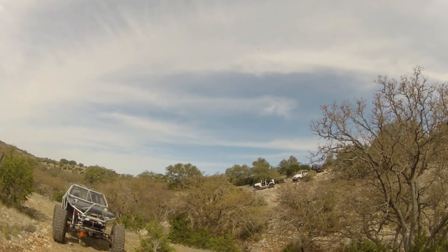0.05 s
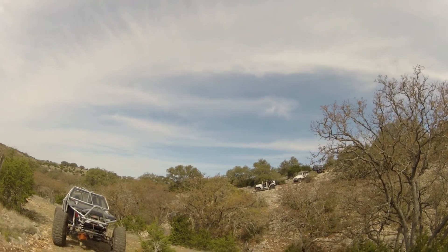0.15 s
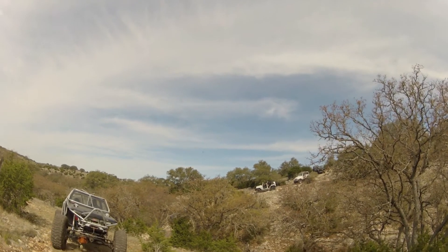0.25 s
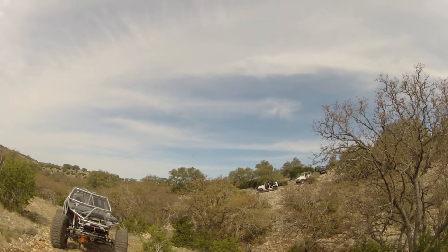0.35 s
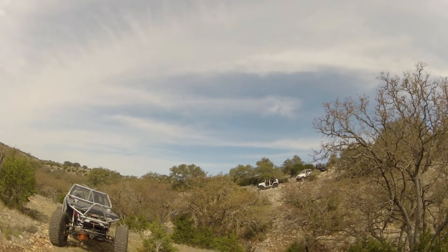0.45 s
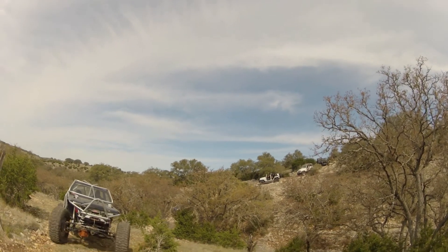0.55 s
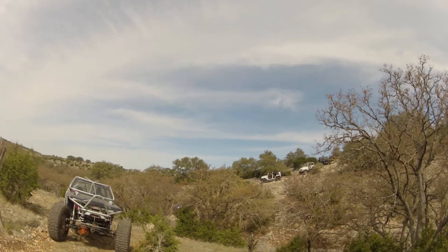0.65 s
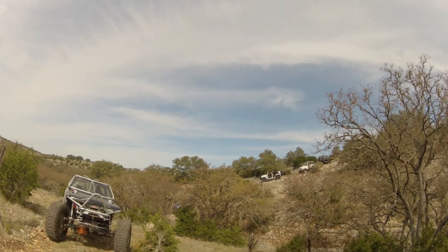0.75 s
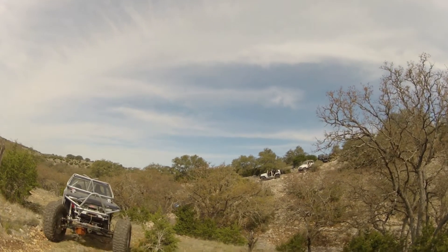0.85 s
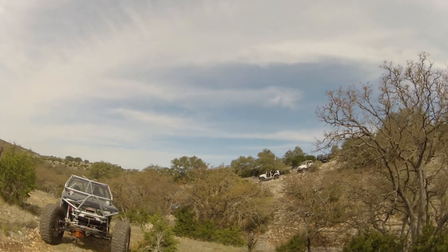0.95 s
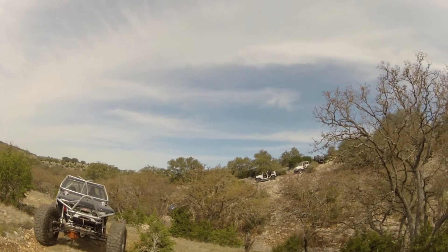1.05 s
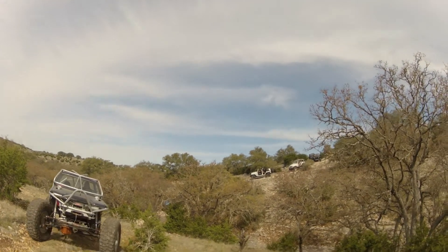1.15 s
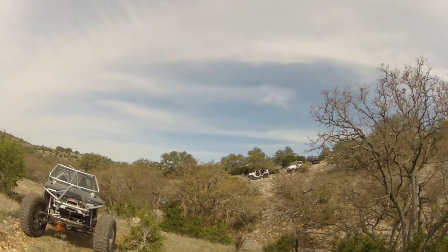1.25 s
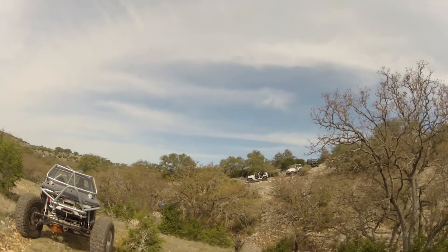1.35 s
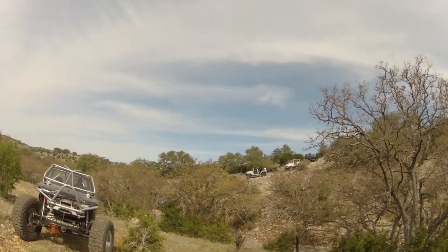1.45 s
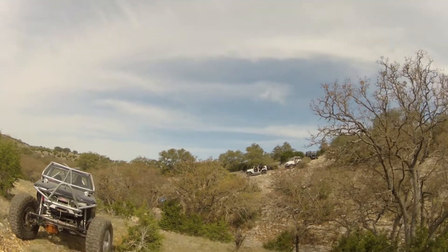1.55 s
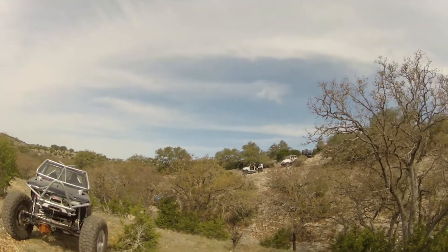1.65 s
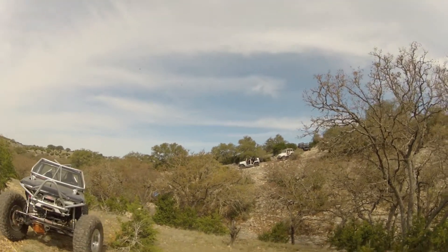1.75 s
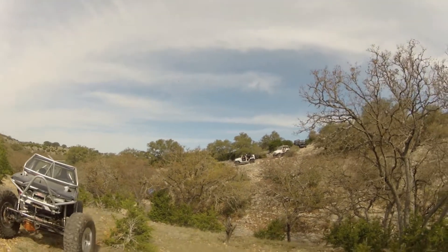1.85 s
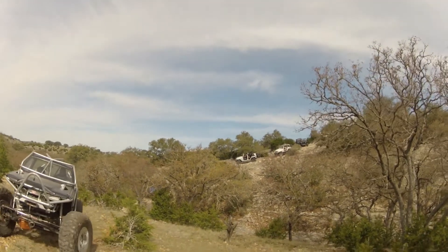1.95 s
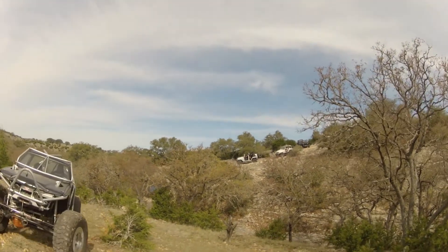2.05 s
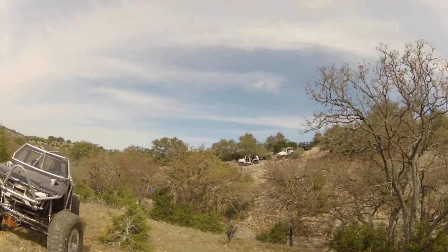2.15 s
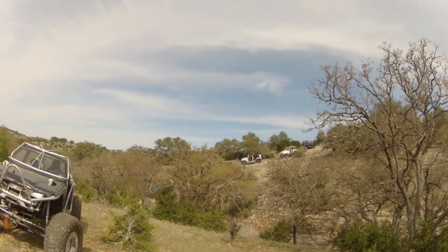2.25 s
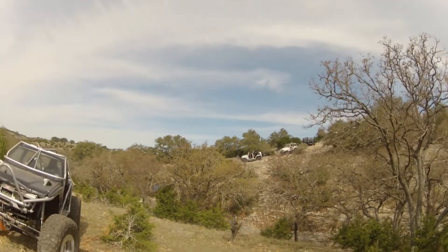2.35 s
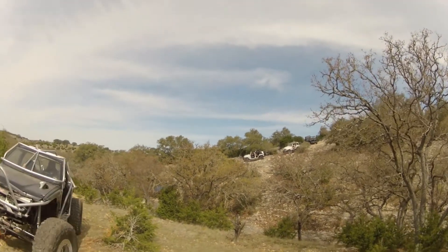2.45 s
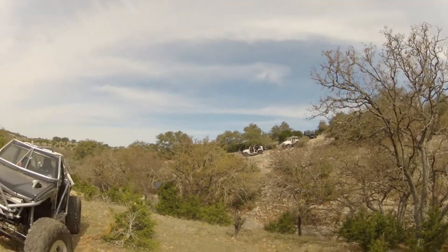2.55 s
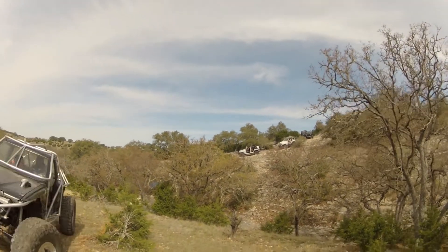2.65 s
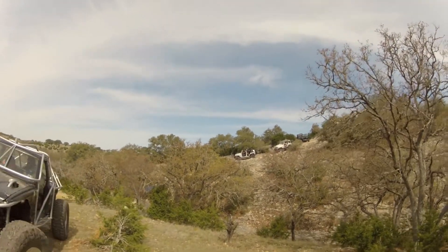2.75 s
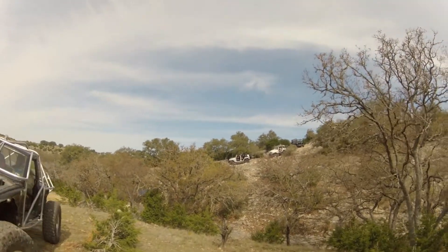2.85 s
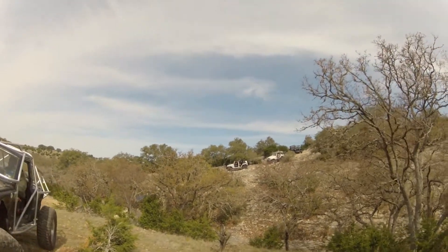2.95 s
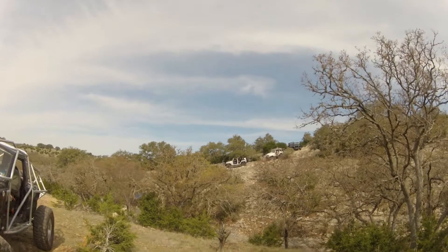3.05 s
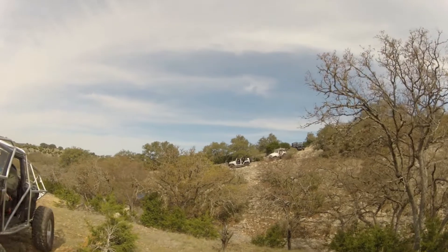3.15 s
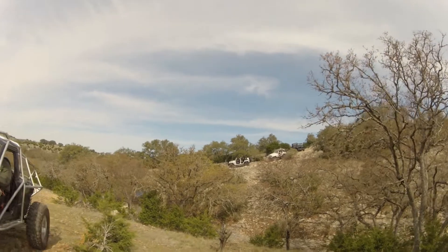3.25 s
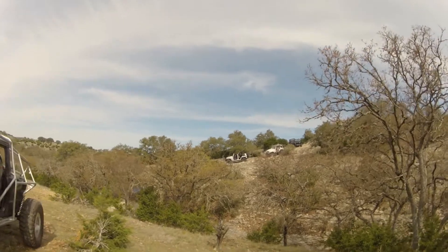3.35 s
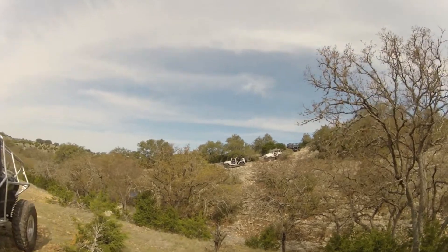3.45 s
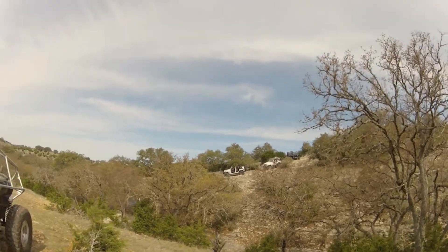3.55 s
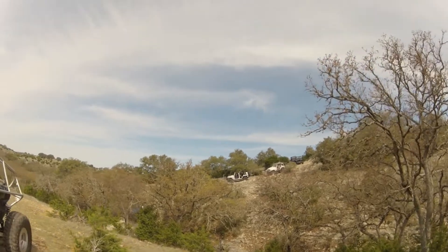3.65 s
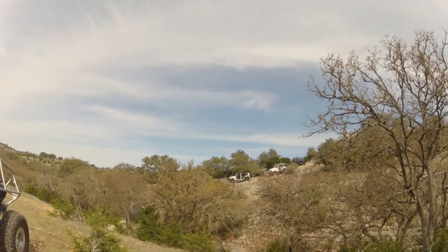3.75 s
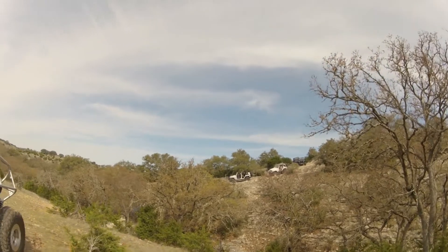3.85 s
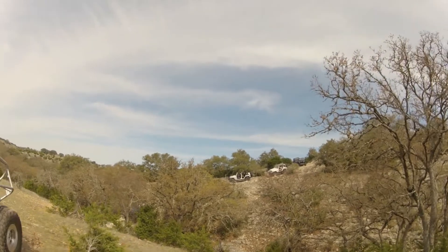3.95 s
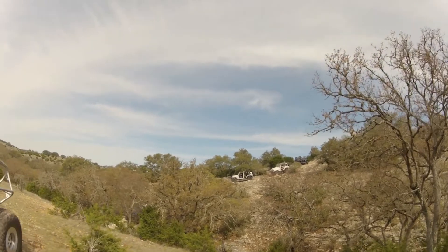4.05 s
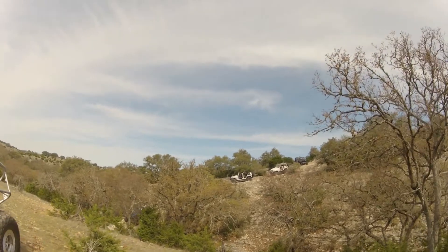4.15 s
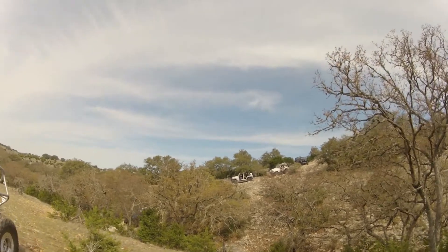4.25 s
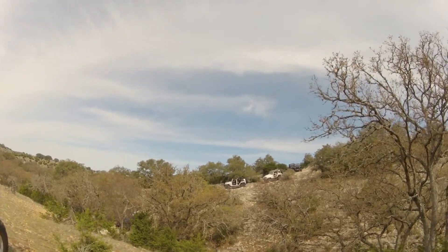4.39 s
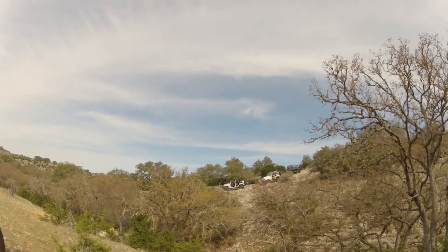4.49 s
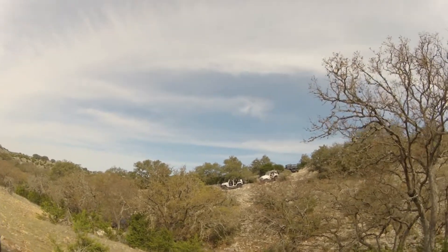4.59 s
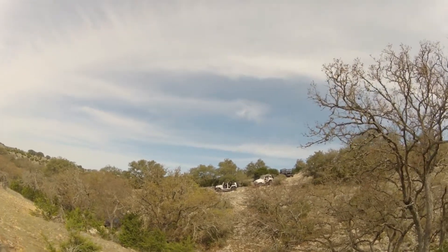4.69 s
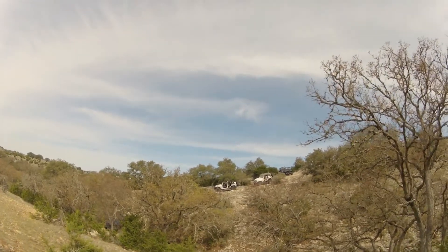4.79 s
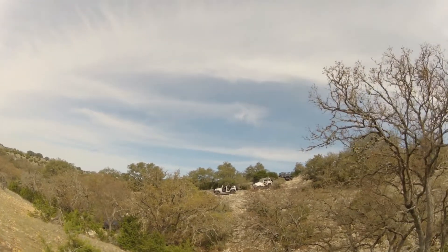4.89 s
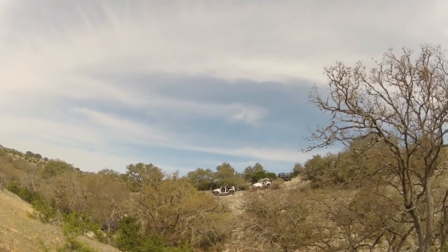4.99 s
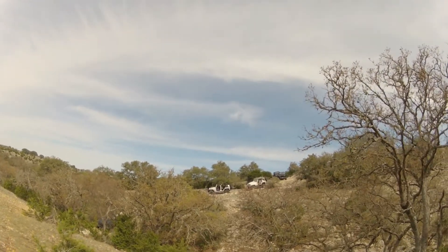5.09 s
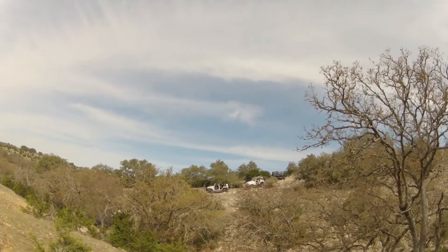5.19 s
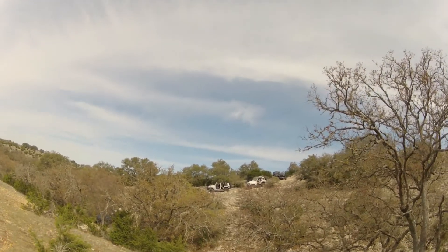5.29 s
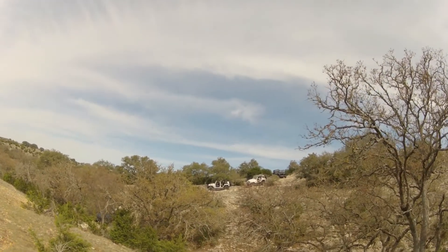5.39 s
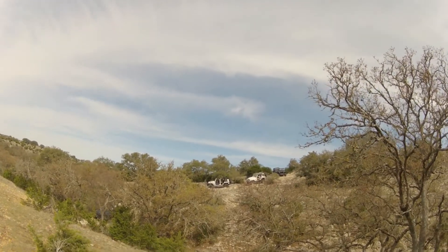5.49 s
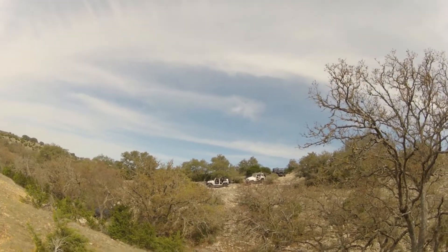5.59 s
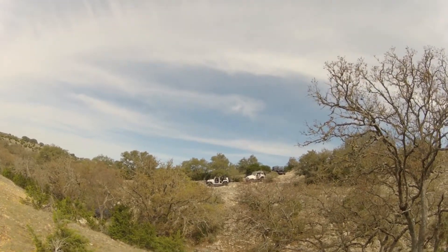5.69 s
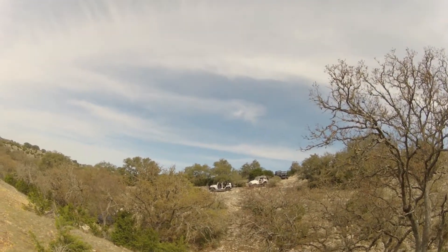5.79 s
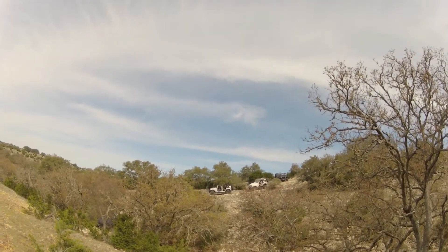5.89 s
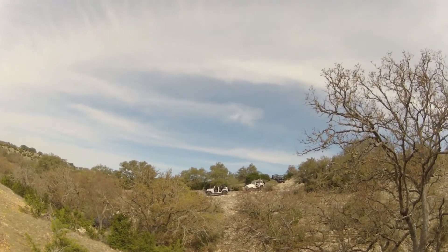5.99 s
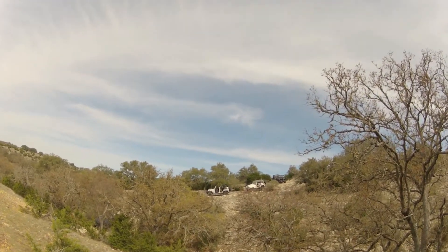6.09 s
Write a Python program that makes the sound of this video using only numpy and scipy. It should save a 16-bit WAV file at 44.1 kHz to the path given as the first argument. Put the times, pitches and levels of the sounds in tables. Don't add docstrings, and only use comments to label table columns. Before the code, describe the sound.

Close outdoor stereo sound of an off-road buggy crawling over stones. A deep, throaty exhaust boom starts at medium speed and sags until about 1.1 s, while a cluster of dry stone snaps crackles around 0.6-0.9 s and a soft knock falls at 0.9. From 1.2 the engine pulls up hard, peaking near 2 s and roaring with slight wavering until 3, with ringing stone clicks at 1.3 and 1.4 and faint creaks. It then lowers; gritty tyre hiss is fullest around 3.5-3.9, with two short, dull, hard knocks at 3.65 and 3.85. Engine clatter, faint fan hum, hollow panel resonance and airy hiss run underneath. The engine holds lower until 4.8, then slows steadily. A gear whine glides down from 4.2 to 5.5, a thin brake squeak peaks at 5.4 and a low pipe drone at 5.5. It ends in a quieter, lumpy idle with a few small stone ticks.

```python
import sys
import numpy as np
from scipy import signal
from scipy.io import wavfile
from scipy.ndimage import uniform_filter1d

SR = 44100
rng = np.random.default_rng(int(sys.argv[2]) if len(sys.argv) > 2 else 0)


def wav_out(sig):
    wavfile.write(sys.argv[1], SR, np.round(np.clip(np.atleast_2d(sig).T, -1, 1) * 32767).astype(np.int16))


def magnitude_from_level(level_db):
    exponent = np.asarray(level_db, float) / 20
    return 10 ** exponent


N = 270333

# f/Hz, left-right likeness [-1 to 1]
LIKENESS = [(200, .99), (630, .98), (1380, .91), (2500, .78), (3700, .6), (5000, .62), (6500, .55),
            (9000, .1), (14000, 0)]
# f/Hz, left minus right level/dB
BALANCE = [(60, 1.0), (110, -1), (200, -0.5), (370, 1.5), (690, 0.5), (1270, 0), (2330, 0.5), (4300, 1),
           (7910, -6), (14600, 5)]
# f/Hz, level/dB per Hz
CLATTER_COLOUR = [(190, -7.5), (250, -10), (330, -7.5), (420, -5), (560, -10.5), (700, -9.5), (880, -5),
                  (1050, -10), (1400, -9), (2160, -9), (2900, -17.5), (3800, -22), (4940, -46)]
# f/Hz, level/dB per Hz
HISS_COLOUR = [(1940, -20), (3300, 0.5), (3410, -26), (3770, -3.5), (5010, 2), (5840, -7), (6930, -2),
               (9270, -6.5), (10100, -7.5), (13400, -16.5), (14200, -23), (14600, -31), (15000, -41)]
# t/s, hiss level/dB
CRAWL = [(0.0, -49.5), (.36, -52), (.8, -41), (1.16, -43), (1.7, -41.5), (1.95, -45.5), (2.42, -43),
         (3.11, -41), (3.46, -38), (3.89, -38), (4.3, -41), (5.1, -41), (6.13, -45.5)]
# f/Hz, bandwidth/Hz, level/dB
FAN = [
    (437.3, 3, -42.5),
    (871.4, 3.9, -47.5),
    (1321, 7, -56),
]
# t/s, half length/s, level/dB
FAN_SHADOWS = [(2.1, .3, -3), (3.1, .3, -4), (6.13, .3, -4)]
# (t/s, half length/s, level/dB)
PANELS = [
    (314, 110, -68, [(3.3, .4, -41), (4.6, .4, -39), (5.7, 0.71, -52)]),
    (576, 122, -58, [(.8, 0.68, -43), (1.65, 0.34, -39.5), (2.4, 0.35, -39.5), (4.6, 0.56, -45)]),
    (787, 133, -55.5, [(2.7, .45, -39), (3.7, 0.75, -42.5)]),
    (1162, 100, -52, [(3.1, 0.69, -43.5), (5.4, .4, -51)]),
]
# (t/s, half length/s, level/dB)
WHISTLES = [
    (6900, 220, -61.5, [(2.6, .7, -56), (3.8, 0.55, -60), (4.6, 0.33, -46.5)]),
    (6700, 200, -68, [(4.0, 0.27, -53), (5.3, 0.48, -48)]),
    (5000, 1050, -54.5, [(1.5, 1.35, -56), (3.2, 0.57, -53)]),
    (10240, 200, -72, [(4.1, .35, -54), (5.35, .4, -49.5)]),
    (8600, 200, -58, [(1.5, 0.78, -61), (5.7, .35, -51)]),
]
# t/s, f/Hz, level/dB
CREAKS = [
    [(1.25, 1420, -45), (1.47, 1460, -44)],
    [(3.79, 690, -37), (3.93, 730, -37)],
    [(2.3, 560, -30), (2.42, 530, -47)],
]
# t/s, f/Hz, level/dB
GEAR = [(4.2, 1745, -48), (4.5, 1700, -45.5), (4.74, 1715, -52), (4.79, 1610, -46), (4.92, 1565, -42),
        (5.07, 1450, -40.5), (5.2, 1350, -41.5), (5.3, 1275, -44), (5.55, 1180, -50)]
# t/s, f/Hz, level/dB
SQUEAK = [
    (5.22, 3262, -56),
    (5.32, 3258, -47),
    (5.41, 3254, -43),
    (5.52, 3258, -47),
]
# t/s, f/Hz, level/dB
DRONE = [
    (5.4, 137, -34),
    (5.52, 133, -29),
    (5.66, 127, -35),
]
# t/s, peak level/dB, f/Hz, 60 dB decay/s
KNOCKS = [
    (.93, -25.5, 278, 0.14),
    (3.6531, -4, 308, 0.015),
    (3.856, -10, 326, 0.014),
]
# t/s, peak level/dB, ring level/dB, 60 dB decay/s
SNAPS = [(0.0534, -31, -14, 0.06), (0.5871, -23, -24, 0.02), (0.5968, -25, -23, 0.018),
         (0.6424, -21, -26, 0.065), (0.6484, -26.5, -5.5, 0.04), (0.7022, -17, -13.5, 0.024),
         (0.7084, -14, -24, 0.062), (0.722, -20.5, -21, 0.19), (0.7444, -27, -24, 0.1),
         (0.8669, -9, -11, 0.065), (1.2644, -42, -10, 0.06), (1.3724, -36, 0, 0.06),
         (1.6194, -23, -14, 0.06), (2.3146, -23, -17.5, 0.053), (3.2924, -19.5, -16, 0.048),
         (5.62, -27, -22, .06), (5.77, -31, -24, .4), (6.1, -25.5, -26, 0.069)]
# f/Hz, level/dB, 60 dB decay/s
STONE = [(990, -8, .08), (1330, -9, .1), (1440, -10, .1), (1620, -8, .1), (1927, 0, .11), (2010, -8, .06),
         (3100, -16, .04)]
# multiple of the crank speed, level/dB
ORDERS = [(1, -43.2), (2, -11.0), (3, -0.4), (4, 0.0), (5, -5.0), (6, -2.3), (7, -13.1), (8, -10.6),
          (9, -19.1), (10, -21.1)]
# thirds of the crank speed, level/dB
LOPE = [(4, -39), (5, -29), (7, -26.5), (8, -25.5), (10, -30), (11, -20), (13, -15.5), (14, -25), (16, -27),
        (17, -18), (19, -18), (20, -18), (23, -23)]
# f/Hz, level/dB
PIPE = [(28, -2), (48, -9.3), (58, -12.4), (68, -6.9), (76, -10.7), (88, -12.2), (102, -16.2), (118, -18.5),
        (137, -10.4), (150, -11.8), (168, -14.9), (190, -15.5), (215, -22), (270, -23)]
# crank f/Hz, phase lag/rad
BANK_LAG = [(13, 2.3), (27, 2.3), (34, -.8)]
# crank f/Hz, orders 1-3 over the load/dB,
# orders 5-10 whatever the load/dB, in-between orders over the load/dB
BY_SPEED = [(14, -8, -14.5, 6), (15.1, -12, -10, 4), (20.5, -11, -12.5, 6), (23, -2, -14, -12),
            (24.12, 8, -8.5, 3.5), (27.25, 2.5, -9, 4), (30.6, 0.7, -12, 1.4), (33.9, -3.5, -17, 4)]
# t/s, f/Hz
SPEED = [(0.0, 27.75), (.33, 27.65), (.44, 25.9), (.77, 24.75), (1.14, 23.55), (1.4, 27.4), (1.76, 30.9),
         (1.94, 35.6), (2.27, 33.1), (2.62, 35.0), (2.88, 33.7), (3.08, 29.9), (3.52, 27.2), (3.72, 24.95),
         (4.8, 24.6), (5.08, 21.9), (5.58, 15.5), (6.13, 13.3)]
# t/s, level/dB, left minus right/dB, tailpipe turned to the microphone/dB
LOAD = [(0.0, -9.5, 1.1, -1), (.3, -9.5, 1.1, 0), (.77, -15, 1.1, 1.5), (1.06, -18.5, 1.1, 3.5),
        (1.43, -6.5, 1.3, 3.5), (1.76, -1.5, 0.7, 0.3), (2.25, -2, -1.4, 0.1), (3.08, -2.5, 1.1, -0.3),
        (3.74, -8.5, 1.1, -0.2), (4.8, -10, .3, -1.5), (5.1, -9.5, 1.6, -.6), (5.3, -16.5, 1.05, -0.5),
        (5.55, -24, 1.05, .6), (6.13, -21, 1.2, -.6)]


def at_hz(points, hz):
    points = np.array(points)
    return np.interp(np.log(hz), np.log(points[:, 0]), points[:, 1])


def in_time(rows):
    s, *columns = np.transpose(rows)
    return [np.interp(np.arange(N) / SR, s, c) for c in columns]


def rms_one(x):
    return x / np.sqrt(np.mean(x ** 2) + 1e-20)


def drift(rate):
    every, settle = 40, 2000
    r = np.exp(-2 * np.pi * every * rate / SR)
    white = rng.standard_normal(N // every + settle + 2)
    slow = rms_one(signal.lfilter([1], [1, -2 * r, r * r], white)[settle:])
    return np.interp(np.arange(N) / every, np.arange(len(slow)), slow)


def ring(clicks, hz, t60):
    r = magnitude_from_level(-60 / (t60 * SR))
    w = 2 * np.pi * hz / SR
    return signal.lfilter([0, np.sin(w)], [1, -2 * r * np.cos(w), r * r], clicks + 1e-18)


def bandpass(x, low, high):
    return signal.sosfilt(signal.butter(2, [low, high], "band", fs=SR, output="sos"), x)


def pan(x, db):
    return np.array([x * magnitude_from_level(db / 2), x * magnitude_from_level(-db / 2)])


def bell(s, half_s):
    return np.exp(-((np.arange(N) / SR - s) / half_s) ** 2)


def swelling(rest_db, swells):
    return magnitude_from_level(rest_db) + sum(magnitude_from_level(db) * bell(s, half_s) for s, half_s, db in swells)


def banded_noise(spectrum, patchy_db, envelope):
    out = 0
    together = drift(17.5)
    lowest, highest = spectrum[0][0], spectrum[-1][0]
    edges = lowest * 2 ** np.arange(0, np.log2(highest / lowest), 1 / 3)
    white = rng.standard_normal((2, 2, N)) * envelope
    opposite = np.array([[1], [-1]])
    for k, (low, high) in enumerate(zip(edges, edges[1:])):
        mid, side = bandpass(white[k % 2], low, high)
        hz = np.sqrt(low * high)
        alike = np.clip(at_hz(LIKENESS, hz), -.99, .999)
        gain = magnitude_from_level(at_hz(spectrum, hz) + patchy_db * (0.55 * together + drift(2.76)))
        both = np.sqrt(1 + alike) * mid + np.sqrt(1 - alike) * side * opposite
        out = out + gain * both * magnitude_from_level(at_hz(BALANCE, hz) / 2 * opposite)
    return rms_one(out)


def whine(rows, flutter_db):
    hz, db = in_time(rows)
    t = np.arange(N) / SR
    gate = np.clip(np.minimum(t - rows[0][0], rows[-1][0] - t) / 0.05, 0, 1)
    waver = 1 + 0.00298 * flutter_db * drift(17.3)
    phase = 2 * np.pi * np.cumsum(hz * waver) / SR
    return gate * magnitude_from_level(db + 3 + flutter_db * drift(25)) * np.sin(phase)


def rumble():
    low = bandpass(rng.standard_normal(N), 32, 200)
    return magnitude_from_level(-42.5 + 2.5 * drift(2.3)) * rms_one(low)


def whistles():
    out = 0
    for hz, width, rest_db, swells in WHISTLES:
        air = rng.standard_normal(N) + .6 * rng.standard_normal((2, N))
        tone = rms_one(ring(air, hz, 2.2 / width))
        out = out + swelling(rest_db, swells) * magnitude_from_level(1.5 * drift(5)) * tone
    return pan(1, -3.5)[:, None] * out


def panels():
    out = 0
    for hz, width, rest_db, swells in PANELS:
        t60 = 1.4 / width
        shaken = ring(ring(rng.standard_normal(N), hz, t60), hz, t60)
        out = out + swelling(rest_db, swells) * magnitude_from_level(2.1 * drift(5.9)) * rms_one(shaken)
    return out


def fan():
    t = np.arange(N) / SR
    hum = 0
    for hz, width, db in FAN:
        halo = rms_one(ring(rng.standard_normal(N), hz, 1.2 / width))
        line = np.sin(2 * np.pi * hz * t + 1.5 * drift(1.2))
        hum = hum + magnitude_from_level(db) * (line + .65 * halo)
    shadow_db = sum(db * bell(s, half_s) for s, half_s, db in FAN_SHADOWS)
    return magnitude_from_level(.5 + shadow_db) * hum


def creaks():
    return sum(whine(c, 3.24) for c in CREAKS)


def brake():
    return whine(SQUEAK, .5)


def gear(angle):
    return whine(GEAR, 2.6) * (1 + .8 * np.cos(angle))


def knocks():
    out = np.zeros(N)
    for s, db, hz, t60 in KNOCKS:
        click = np.zeros(N)
        click[round(s * SR)] = magnitude_from_level(db + 1.0)
        out += ring(click, hz, t60)
    return bandpass(out, 230, 600)


def snaps():
    crack, clicks = np.zeros((2, N)), np.zeros((len(STONE), N))
    scatter_db = rng.normal(0, 1, (len(SNAPS), len(STONE)))
    noise = rng.standard_normal(N) + 0.46 * rng.standard_normal((2, N))
    for (s, db, ring_db, t60), own_db in zip(SNAPS, scatter_db):
        i = round(s * SR)
        t = np.arange(min(N - i, SR // 8)) / SR
        burst = magnitude_from_level(db - 5 - 60 * t / t60) * np.minimum(t / 0.00033, 1)
        crack[:, i:i + len(t)] += burst * noise[:, i:i + len(t)]
        clicks[:, i] = magnitude_from_level(db + ring_db + own_db)
    modes = sum(magnitude_from_level(db + 3) * ring(c, hz, t60) for c, (hz, db, t60) in zip(clicks, STONE))
    return bandpass(crack, 1600, 10500) + modes


def tyre_hiss():
    hiss_db, = in_time(CRAWL)
    cracks = (rng.random(N) < 60 / SR) * rng.uniform(0, .7, N)
    grit = 1 + signal.lfilter([1], [1, -magnitude_from_level(-60 / (0.042 * SR))], cracks)
    return magnitude_from_level(hiss_db) * banded_noise(HISS_COLOUR, 1.0, grit)


def clatter(angle):
    hiss_db, = in_time(CRAWL)
    usual_hiss_db = -42
    level_db = -33.5 + 0.34 * (hiss_db - usual_hiss_db)
    firing = 1 + 0.062 * np.cos(3 * angle) + 0.04 * np.cos(angle)
    return magnitude_from_level(level_db) * banded_noise(CLATTER_COLOUR, 1.07, firing)


def exhaust():
    inertia_s = .08
    start_rad, pipe_lag_rad = 1.35, .37
    idle_below_hz, idle_lumps_db = 21, 1.5
    crank_hz = uniform_filter1d(in_time(SPEED)[0], int(inertia_s * SR), mode="nearest")
    load_db, balance_db, facing_db = in_time(LOAD)
    speed, *laws = np.transpose(BY_SPEED)
    low_db, upper_db, lope_db = [np.interp(crank_hz, speed, law) for law in laws]
    angle = start_rad + 2 * np.pi * np.cumsum(crank_hz) / SR
    orders = []
    for k, db in ORDERS:
        coloured_db = db + low_db * (k < 4) + (upper_db + facing_db - load_db) * (k > 4)
        orders.append((k, coloured_db, .6))
    orders += [(k / 3, db + lope_db, 2.5) for k, db in LOPE]
    out = np.zeros(N)
    for k, db, shake_db in orders:
        level = magnitude_from_level(db + at_hz(PIPE, k * crank_hz) + shake_db * drift(6))
        lag = pipe_lag_rad + .12 * shake_db * drift(6)
        if k == 7:
            lag = lag + np.pi
        if k % 1 > 0:
            lag = lag + rng.uniform(0, 2 * np.pi)
        if k == 2:
            lag = lag + at_hz(BANK_LAG, crank_hz)
        out += level * np.cos(k * angle - lag)
    lumps_db = idle_lumps_db * np.clip((idle_below_hz - crank_hz) / 4, 0, 1) * drift(9)
    return pan(magnitude_from_level(load_db + lumps_db) * out, balance_db), angle


def scene():
    boom, angle = exhaust()
    centred = rumble() + panels() + fan() + creaks() + brake() + gear(angle) + knocks()
    centred = centred + whine(DRONE, 0.55)
    return whistles() + pan(centred, 0.66) + snaps() + tyre_hiss() + clatter(angle) + boom


def top_cut(x):
    return signal.sosfilt(signal.butter(12, 15160, fs=SR, output="sos"), x)


def record(dry):
    heard = np.array([np.r_[dry[0, :2], dry[0, :-2]], dry[1]])
    heard = signal.sosfilt(signal.cheby2(10, 60, 15800, fs=SR, output="sos"), heard)
    heard = heard - .55 * signal.lfilter(*signal.iirpeak(4080, 7, fs=SR), heard)
    return top_cut(heard)


dry = scene()
out = record(dry)
wav_out(out)
```